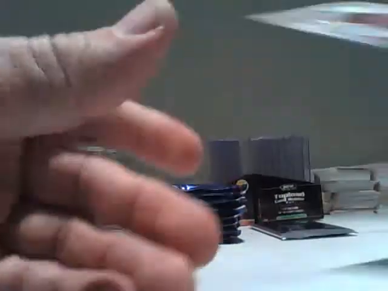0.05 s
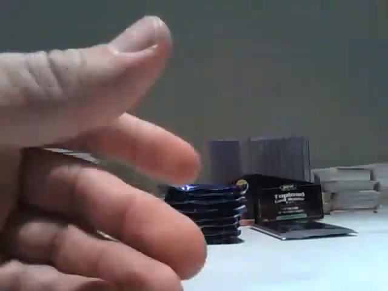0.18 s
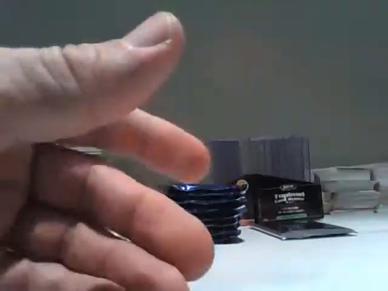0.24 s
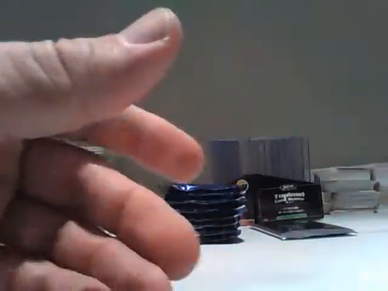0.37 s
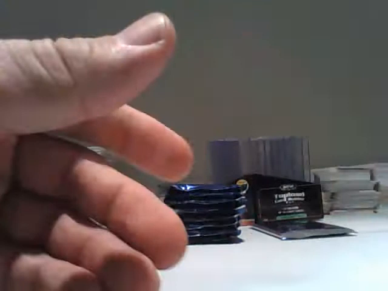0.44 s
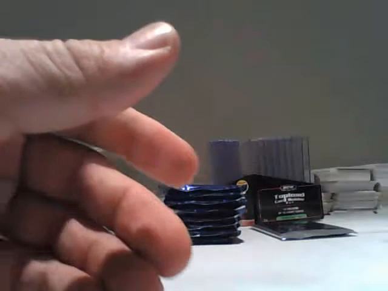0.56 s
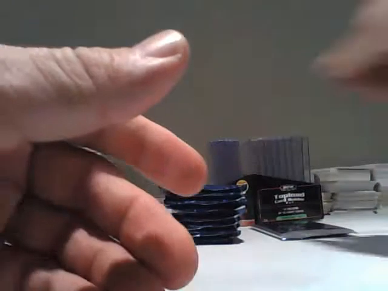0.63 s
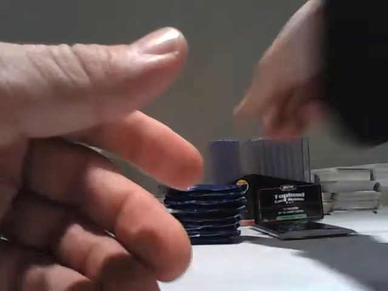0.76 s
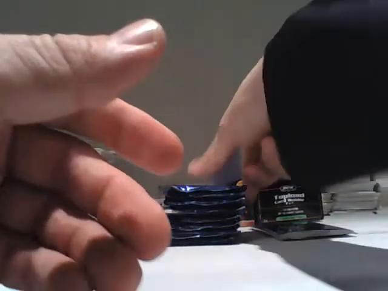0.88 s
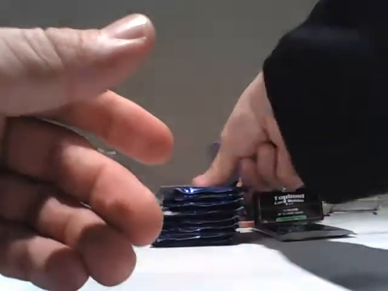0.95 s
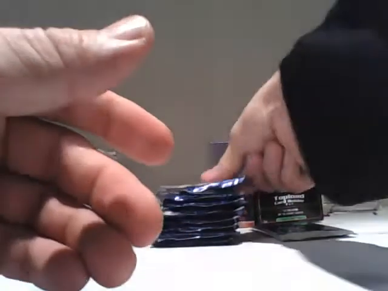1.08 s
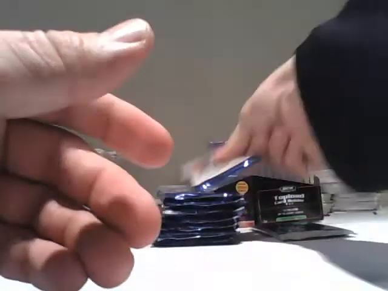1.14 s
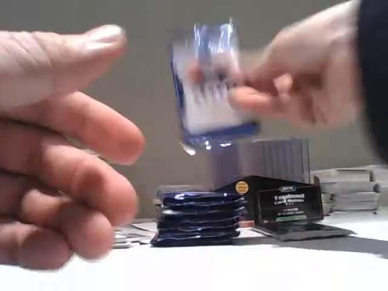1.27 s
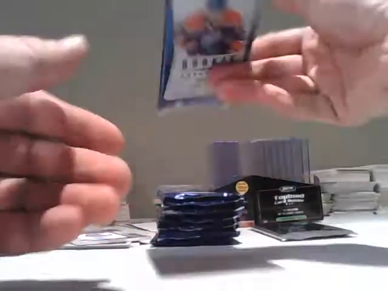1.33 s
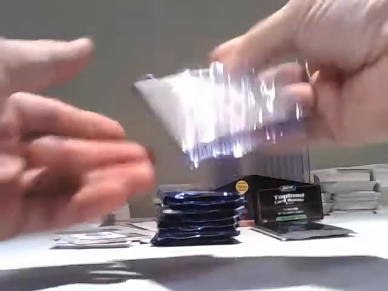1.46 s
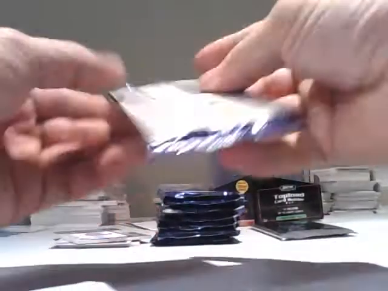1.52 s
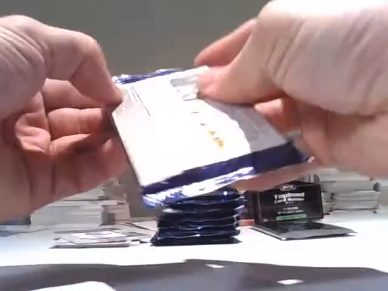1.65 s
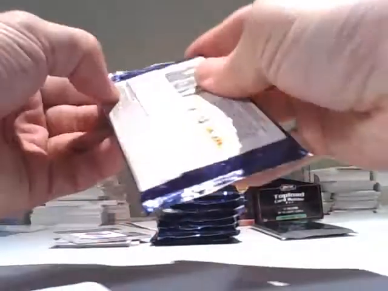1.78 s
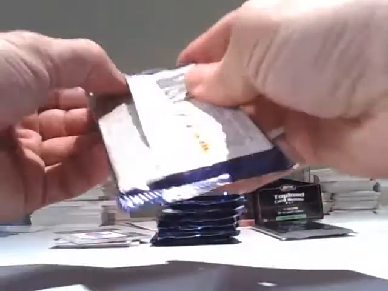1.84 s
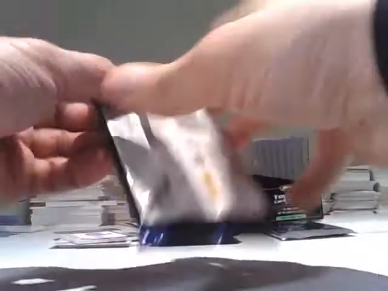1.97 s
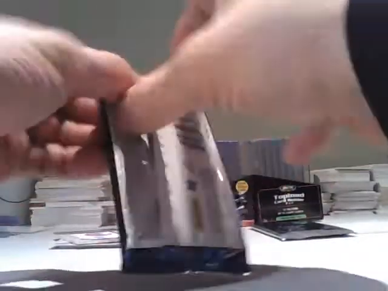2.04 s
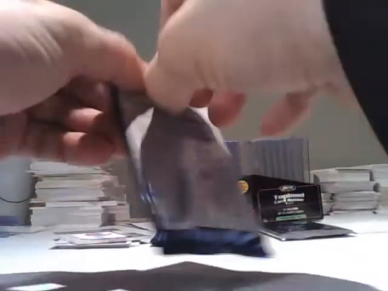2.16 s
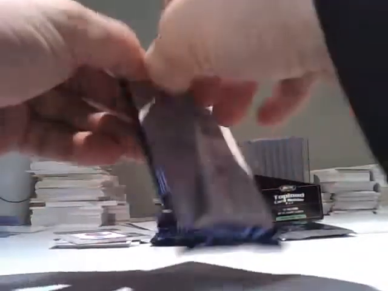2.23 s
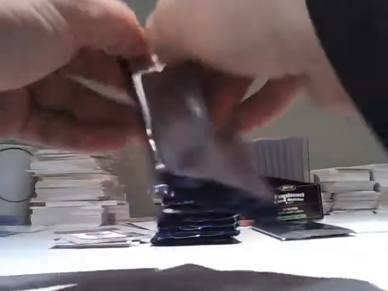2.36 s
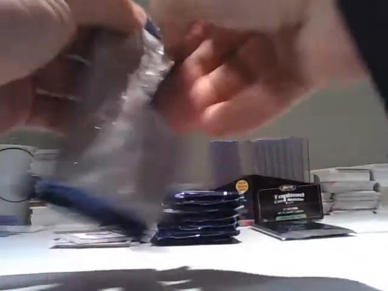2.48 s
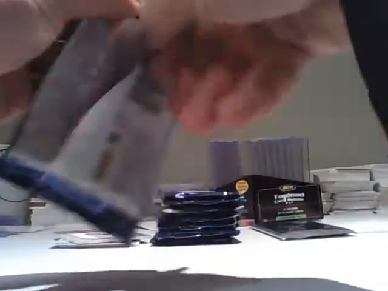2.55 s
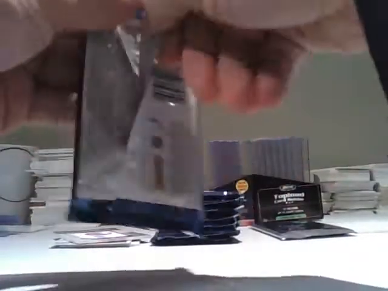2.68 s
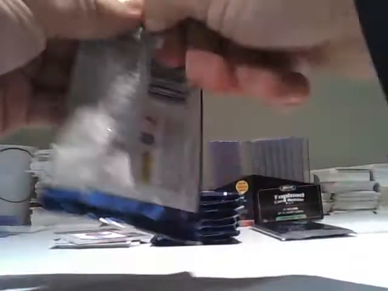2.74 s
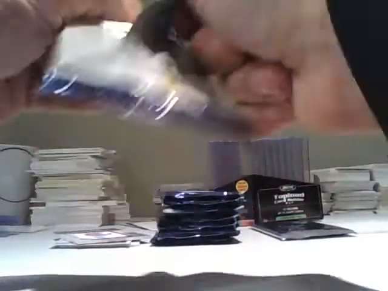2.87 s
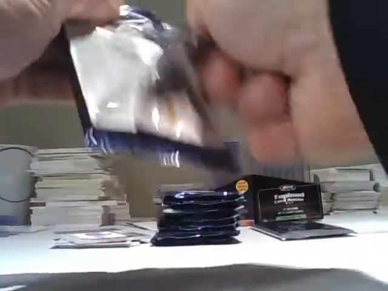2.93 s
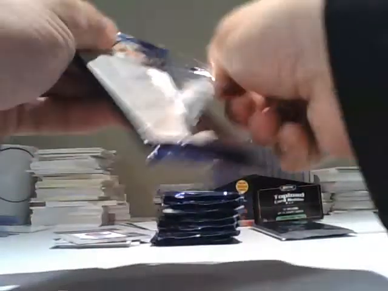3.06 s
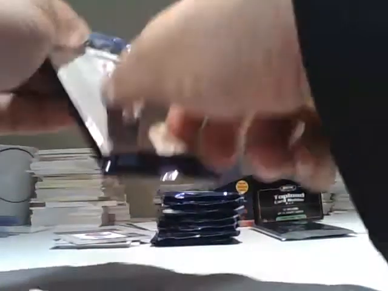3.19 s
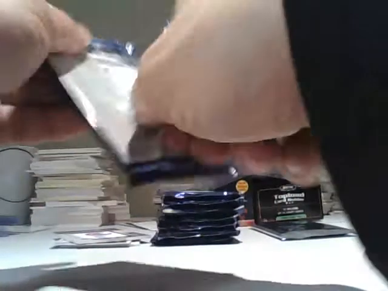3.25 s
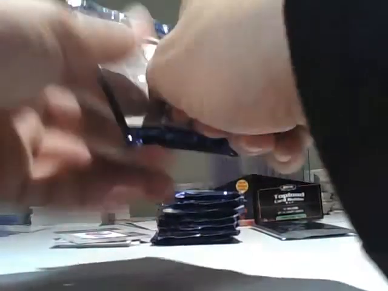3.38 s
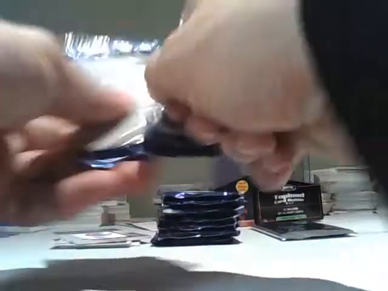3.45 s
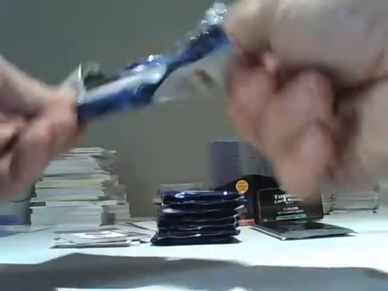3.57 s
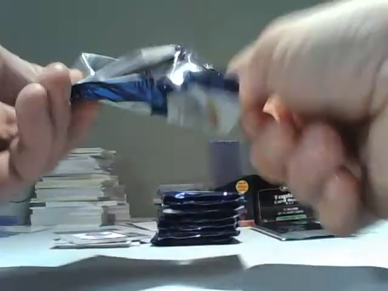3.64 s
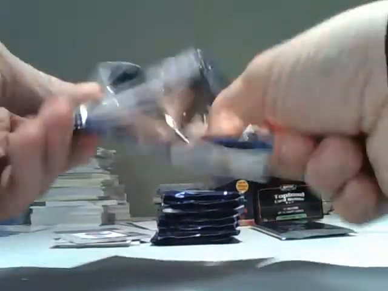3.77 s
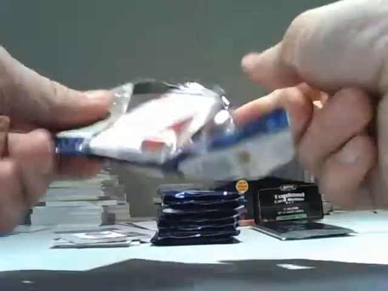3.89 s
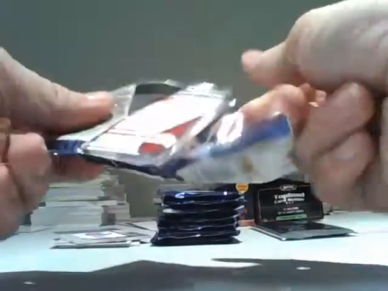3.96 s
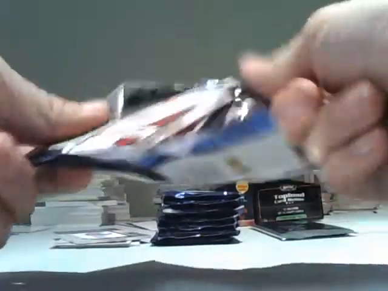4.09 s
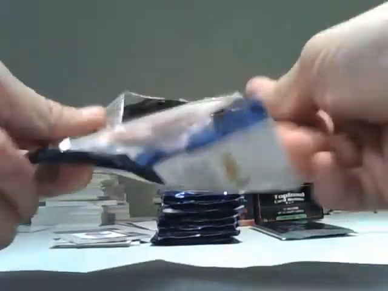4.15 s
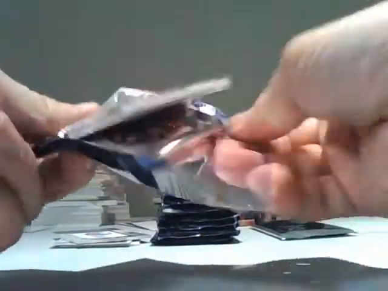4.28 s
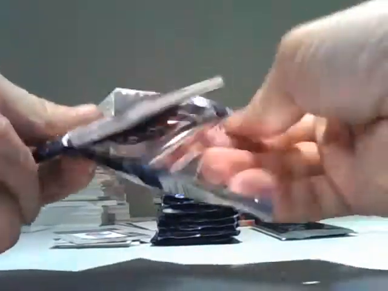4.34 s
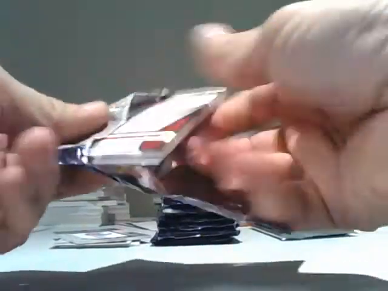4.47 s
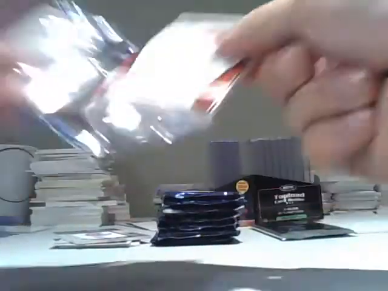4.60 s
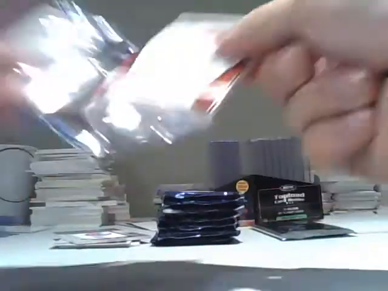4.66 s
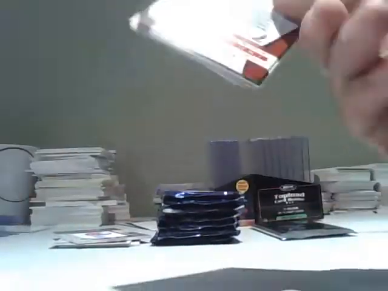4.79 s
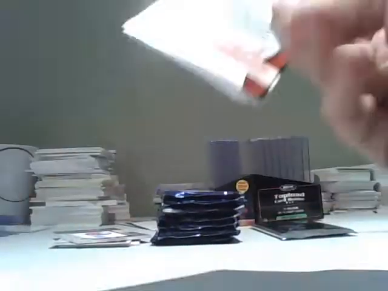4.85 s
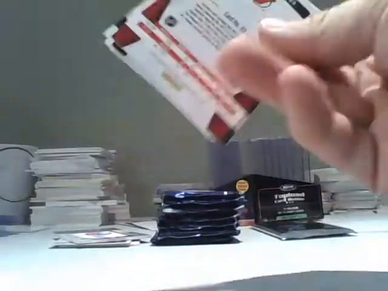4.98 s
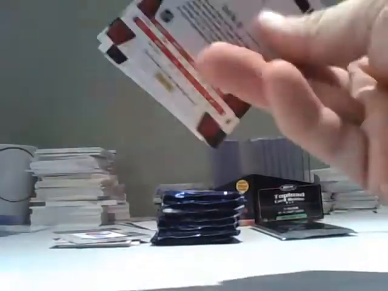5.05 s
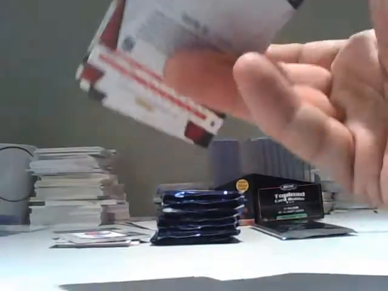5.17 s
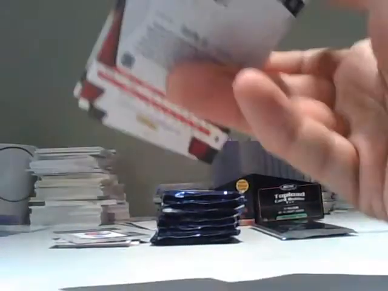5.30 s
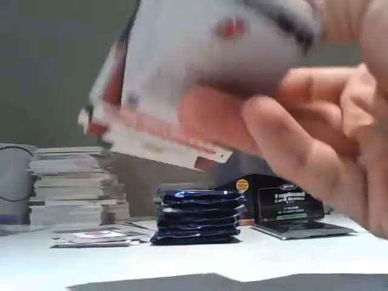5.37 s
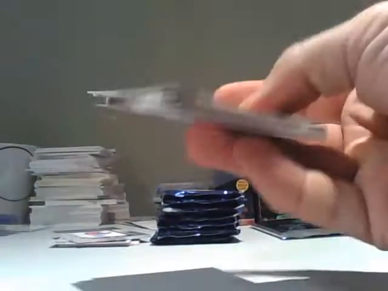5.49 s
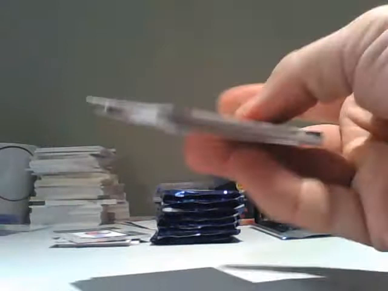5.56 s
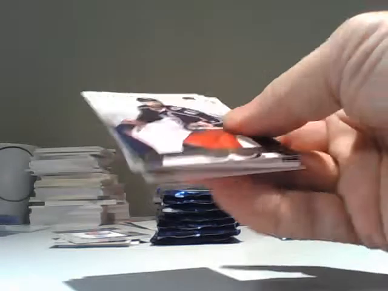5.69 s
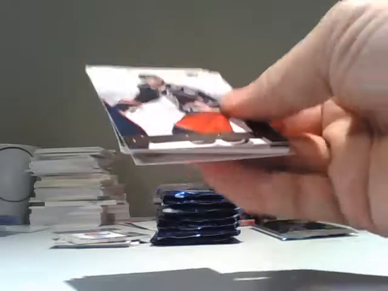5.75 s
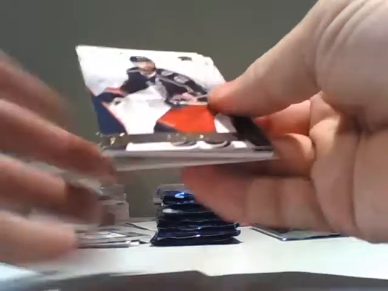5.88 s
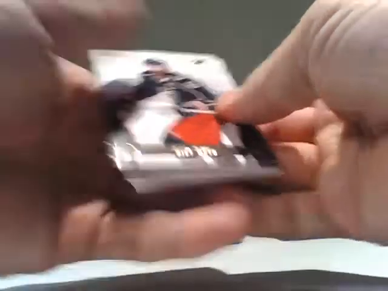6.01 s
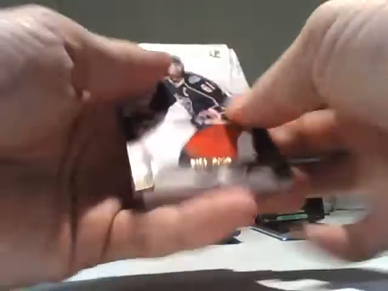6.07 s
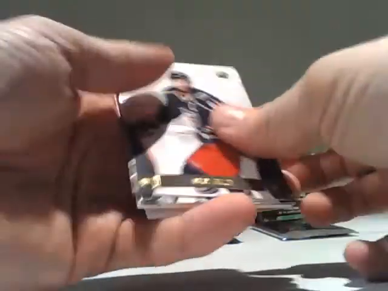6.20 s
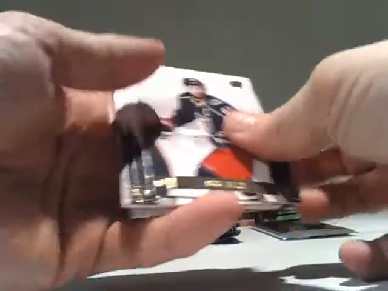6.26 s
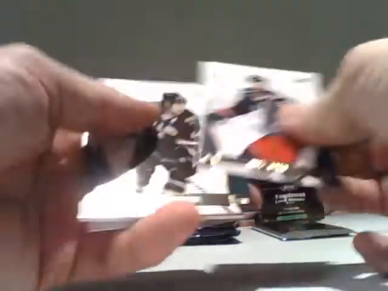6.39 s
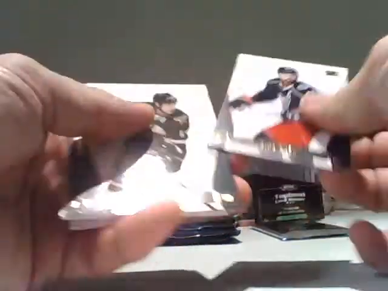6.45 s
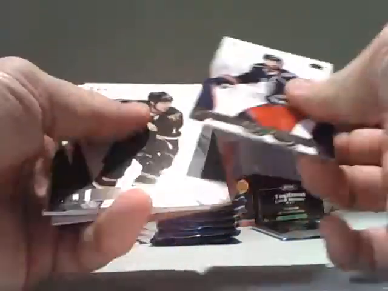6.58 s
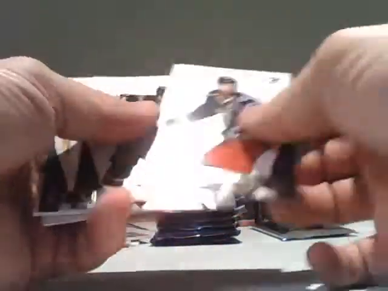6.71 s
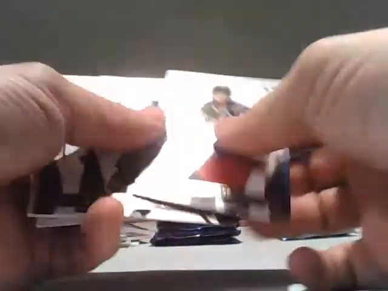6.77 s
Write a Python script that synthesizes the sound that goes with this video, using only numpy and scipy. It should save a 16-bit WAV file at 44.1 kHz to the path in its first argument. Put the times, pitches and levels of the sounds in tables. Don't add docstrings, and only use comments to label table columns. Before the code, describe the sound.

Close to a cheap webcam microphone, card edges scrape and land on a tabletop with a small hard thump. Then stiff foil crackles, snaps and pops hollowly as a packet is squeezed, ripped open and emptied, the rustling thinning into scattered ticks. A soft fan drones throughout, a thin whine joins late, and the stream repeatedly cuts out for split seconds.

```python
import sys
import numpy as np
from scipy import signal
from scipy.io import wavfile
from scipy.ndimage import uniform_filter1d

SR = 44100
rng = np.random.default_rng(int(sys.argv[2]) if len(sys.argv) > 2 else 0)


def rack_gain(trim_db):
    fader = np.asarray(trim_db, float)
    return 10 ** (fader / 20)


def persist_wave(psi):
    counts = np.round(np.clip(psi, -1, 1) * 32767).astype(np.int16)
    wavfile.write(sys.argv[1], SR, np.atleast_2d(counts).T)


N = 301157


def evened(x):
    return x / np.sqrt(np.mean(x ** 2) + 1e-20)


def peaked(x):
    return x / abs(x).max()


def read(points, hz):
    f, value = np.transpose(points)
    return np.interp(np.log(hz + 1), np.log(f + 1), value)


def add(mix, s, sound):
    part = mix[round(s * SR):][:len(sound)]
    part += sound[:len(part)]


def coloured(x, points):
    hz = abs(np.fft.fftfreq(4096, 1 / SR))
    log_gain = np.log(rack_gain(np.maximum(read(points, hz), -100)))
    taps = np.fft.ifft(np.exp(np.conj(signal.hilbert(log_gain)))).real[:2048]
    return signal.oaconvolve(x, taps / np.linalg.norm(taps))[:len(x)]


def resonate(x, hz, width):
    r = np.exp(-np.pi * width / SR)
    return 2 * signal.lfilter([1 - r], [1, -r * np.exp(2j * np.pi * hz / SR)], x).real


def wander(hz):
    return evened(signal.lfilter(*signal.butter(2, hz, fs=SR), rng.standard_normal(N)))


LET_GO_DB_PER_S = 1505


def strokes(rows, rise_db_per_s, fall_db_per_s):
    power = np.full(N, 1e-12)
    for s, length, db, sag_db in rows:
        t = np.arange(-.15, length + .06, 1 / SR)
        build = rise_db_per_s * np.minimum(t, 0)
        sag = sag_db * np.clip(t / length, 0, 1)
        stop = fall_db_per_s * np.maximum(t - length, 0)
        add(power, s + t[0], rack_gain(2 * (db + build + sag - stop)))
    return np.sqrt(power)


# [peak t/s, length t/s, crackle level/dB, sag level/dB, relative hollow level/dB]
SQUEEZES = [(1.975, 0.03, -68.5, -1, 4), (2.066, 0.11, -47.5, -33, -6), (2.192, 0.022, -76, 3, 12),
            (2.284, 0.036, -60.5, -8, -7), (2.315, 0.068, -60.5, -3, 0.5), (2.501, 0.13, -35, -16, -12),
            (2.474, 0.023, -60, 8, -1), (2.683, 0.15, -50.5, -14.5, -5.5), (3, 0.02, -44.5, 1.5, -0.5),
            (3.112, 0.013, -43, 6, -15), (3.212, 0.13, -46.5, -22.5, 2.5), (3.407, .02, -58, 3, -1),
            (3.471, 0.054, -60, -8, -9), (3.616, 0.083, -37, 1, 2), (3.702, 0.054, -34, -12.5, 5.5),
            (3.771, 0.26, -44.5, -14, 2), (4.04, 0.087, -64, 6, 4), (4.261, 0.039, -38.5, -29, -3),
            (4.19, 0.014, -56, 6, 9.5), (4.312, 0.034, -57, 4.5, 5.5), (4.377, 0.26, -49.5, -20.5, 3.5),
            (4.727, 0.057, -57, 0.5, 3.5)]
# [t/s, t/s, level/dB, level/dB, level/dB]
TUGS = [
    (2.637, 0.033, -47, 9, -7),
    (3.034, 0.073, -40, -13.5, -7.5),
    (3.132, 0.065, -34.5, -12, -2),
    (3.438, 0.021, -46.5, -21, -3),
    (3.57, 0.022, -48, -1, -10),
    (4.337, 0.031, -44.5, 1.5, -7),
    (4.626, 0.023, -53, -32, -10),
]


def squeeze():
    gains = np.zeros((2, N))
    for table, rise_db_per_s in ((SQUEEZES, 475), (TUGS, 1801)):
        rows = np.array(table)
        foil = rows[:, :4]
        hollow = foil + np.outer(rows[:, 4], [0, 0, 1, 0])
        now = [strokes(r, rise_db_per_s, LET_GO_DB_PER_S) for r in (foil, hollow)]
        gains = np.hypot(gains, now)
    return gains


# [f/Hz, width f/Hz, level/dB]
POUCH = [
    (678.5, 130, 2.5),
    (690, 120, -3),
    (850, 72, 3),
    (985, 290, -5.5),
    (1220, 91, 0.5),
    (254, 130, -9),
]


def pouch(x):
    modes = np.zeros(len(x))
    for k, (hz, width, db) in enumerate(POUCH):
        modes += (-1) ** k * rack_gain(db) * resonate(x, hz, width)
    return signal.lfilter(*signal.butter(2, 2400, fs=SR), modes)


# [f/Hz, level/dB per Hz]
FOIL = [(760, -49.5), (1300, -13), (1400, -11.5), (1660, -2.5), (2410, -10), (2750, -4), (3050, -9.5),
        (3430, -5.5), (3960, -4.5), (5180, -6.5), (7700, -7), (8520, -10), (9750, -23.5), (12700, -52.5),
        (21400, -120)]


def rustle(crackle, hollow):
    clump = rack_gain(2.1 * wander(54))
    size = rack_gain(3.5 * np.minimum(rng.exponential(1, N), 3.3)) * rng.choice([-1, 1], N)
    ticks = clump * size * (rng.random(N) < 2500 / SR)
    region = rng.integers(0, 16, N // 300 + 1).repeat(300)[:N]
    pitches = np.repeat([1700, 2050, 2750, 3950, 4450, 5900, 6500, 7900], 2) * rng.uniform(.97, 1.03, 16)
    rings = sum(evened(resonate(ticks * (region == k), hz, 160)) for k, hz in enumerate(pitches))
    bright = evened(coloured(evened(ticks) + 0.22 * evened(rings), FOIL))
    flicks = rack_gain(5.1 * np.minimum(rng.exponential(1, N), 3)) * (rng.random(N) < 260 / SR)
    bright = bright + 0.036 * evened(coloured(resonate(flicks, 5900, 4400), FOIL))
    pushes = clump * rack_gain(0.71 * wander(35)) * evened(evened(ticks) + 13.0 * rng.standard_normal(N))
    return rack_gain(-2.0) * crackle * bright + rack_gain(-5.0) * hollow * evened(pouch(pushes))


# [t/s, peak level/dB, f/Hz,
# relative air pocket level/dB]
CREASES = [(0.4515, -59, 2476, 14), (2.0591, -41.5, 2900, -11), (2.0812, -40, 3920, -36),
           (2.2975, -45, 5700, -13), (2.318, -39, 6950, -16), (2.325, -42.5, 6200, -25),
           (2.476, -32, 5000, -23), (2.4962, -38.5, 5000, 12), (2.5142, -28, 4350, -31.5),
           (2.5223, -24, 4400, -4.5), (2.529, -26.5, 8300, -22), (2.536, -29, 6350, -28),
           (2.5615, -31, 5000, -5.5), (2.5701, -36.5, 3960, -23.5), (2.6355, -37, 4200, 3.5),
           (2.6482, -31, 5160, -25), (2.703, -35, 3150, -15), (2.7758, -45, 3860, -0.5),
           (2.81, -47, 7440, -2), (3.039, -32, 2955, -2), (3.0589, -32, 2800, -17),
           (3.1096, -28, 2720, -22), (3.1329, -26, 2480, -7.5), (3.138, -24.5, 1770, -3),
           (3.152, -28, 3800, -7.5), (3.481, -52.5, 5000, -18), (3.2167, -47, 2650, -10),
           (3.257, -38, 2560, -17), (3.409, -47, 2780, -11), (3.4375, -38, 3060, -16),
           (3.921, -37.5, 4500, -6), (3.9625, -37, 3840, -9), (3.9862, -36.5, 7950, -0.5),
           (4.0263, -55.5, 2110, 12.5), (4.0969, -43.5, 4360, -8), (4.2029, -46, 4850, 2),
           (4.2114, -54, 3500, -2), (4.2442, -42, 5460, 14.5), (4.256, -35.5, 4070, -1),
           (4.2907, -48.5, 2340, 13.5), (4.3254, -48, 2760, 3), (4.3357, -32.5, 2780, 3.5),
           (4.344, -42, 3900, -12), (4.3541, -34, 4740, 3), (4.3613, -35, 5000, -20),
           (4.4005, -43.5, 2540, 2), (4.425, -55, 3190, 11), (4.4601, -38, 3970, -1.5),
           (4.6234, -37.5, 4700, -14.5), (4.6228, -42, 7550, -23), (4.7289, -29.5, 4350, -20),
           (4.7385, -43, 7500, -1),
           (2.0257, -55, 2690, -10), (2.0427, -51, 7900, -18), (2.066, -48, 8400, -22),
         (2.123, -52, 8000, -18), (2.2592, -66, 4500, -1), (2.2861, -50, 4630, -4), (2.358, -45, 7860, -18),
         (2.585, -43, 5000, -9), (2.7215, -38, 4970, -15), (2.753, -58, 7000, -20), (2.763, -44, 6800, -18),
         (3.031, -35, 6000, -7), (3.044, -48, 4300, -6), (3.3054, -49, 1660, -17),
         (3.3306, -47.5, 1920, -14), (3.594, -29, 8000, -20), (3.816, -35.5, 8300, -16),
         (3.867, -34.5, 6470, -5), (3.918, -45, 8100, -20), (3.957, -47, 2700, -12),
         (4.085, -52, 4870, -15), (4.113, -59, 8000, -20), (4.2402, -41.5, 4470, 6), (4.2517, -34, 4730, 9),
         (4.3944, -43, 3800, -4), (4.5126, -52, 5700, -13), (4.5435, -62, 6500, -15),
         (4.5855, -51, 4910, -19), (4.634, -45.5, 7500, -19), (4.748, -42, 8000, -20),
         (4.772, -61, 8000, -17), (2.299, -49, 9300, -25), (2.32, -45, 9300, -25), (3.5715, -36, 7500, -29),
         (3.691, -36.5, 7500, -17), (3.665, -31, 6870, -22), (3.923, -39.5, 6900, -20)]
# [t/s, peak level/dB, f/Hz, relative air pocket level/dB, air pocket f/Hz]
TEARING = [(3.5693, -33.5, 8000, -9, 790), (3.5734, -36.5, 4950, -7, 760), (3.578, -32, 4000, -11, 1040),
           (3.5981, -32.5, 4940, 5.5, 710), (3.611, -26, 4130, -17, 920), (3.6201, -38, 4240, 0.5, 750),
           (3.6286, -32, 4300, -2, 620), (3.64, -29.5, 3970, -3, 913), (3.6542, -24.5, 4030, -3.5, 850),
           (3.6625, -34, 4140, 5.5, 595), (3.683, -23, 4570, -7.5, 495), (3.6875, -27.5, 4000, 8.5, 660),
           (3.6955, -24, 2750, 9.5, 850), (3.706, -33, 2630, 14.5, 912), (3.7125, -31, 4010, 3, 766),
           (3.7186, -34.5, 7500, 10, 655), (3.7599, -33, 2800, 0, 940), (3.7743, -42.5, 2200, 5, 583),
           (3.786, -35, 4750, -7, 710), (3.8235, -34, 2000, 1, 720), (3.856, -37.5, 2060, -1, 740),
           (3.872, -35, 3430, -5, 930), (3.8796, -41, 8100, 5, 1220)]
POCKET_HZ = 820


def snaps():
    rows = [(*row, POCKET_HZ) for row in CREASES] + list(TEARING)
    out, t = np.zeros(N), np.arange(1400) / SR
    for (s, db, hz, pocket_db, pocket_hz), noise in zip(rows, rng.standard_normal((len(rows), len(t)))):
        burst = noise * np.exp(-t / 0.0016) * np.minimum(t / 0.00055, 1)
        crack = coloured(peaked(burst) + 1.5 * peaked(resonate(burst, hz, 600)), FOIL)
        pop = -np.sin(2 * np.pi * pocket_hz * t) * t * np.exp(-t / .00095)
        hollow = peaked(np.gradient(pop)) + 0.23 * peaked(pouch(burst))
        add(out, s, rack_gain(db) * (peaked(crack) + rack_gain(pocket_db) * peaked(hollow)))
    return out


# [start t/s, length t/s, f/Hz, level/dB]
TAUT = [(0.489, 0.022, 930, -68), (0.539, 0.046, 6170, -69), (0.573, 0.056, 590, -54),
        (0.583, 0.04, 3860, -75), (2.021, 0.028, 2830, -73), (2.095, 0.022, 6060, -68),
        (2.297, 0.03, 830, -69), (2.313, 0.024, 2030, -67), (2.319, 0.024, 8340, -73),
        (2.325, 0.032, 5860, -65), (2.494, 0.044, 860, -45), (2.524, 0.014, 1690, -52),
        (2.566, 0.018, 3890, -55), (2.628, 0.018, 830, -51), (2.718, 0.038, 2100, -65),
        (2.78, 0.022, 3890, -69), (3.011, 0.062, 930, -53), (3.057, 0.04, 1960, -58),
        (3.109, 0.028, 2790, -54), (3.125, 0.044, 860, -45), (3.255, 0.032, 590, -60),
        (3.255, 0.086, 2690, -64), (3.438, 0.034, 1890, -67), (3.46, 0.014, 6060, -74),
        (3.484, 0.024, 5820, -75), (3.592, 0.07, 830, -42), (3.684, 0.028, 2720, -46),
        (3.702, 0.038, 3820, -47), (3.807, 0.034, 790, -49), (3.817, 0.04, 1960, -56),
        (3.903, 0.146, 830, -50), (3.993, 0.036, 3960, -60), (4.089, 0.032, 7990, -71),
        (4.091, 0.032, 4890, -67), (4.093, 0.038, 3690, -68), (4.095, 0.014, 6270, -72),
        (4.2, 0.016, 4930, -73), (4.202, 0.054, 790, -44), (4.26, 0.062, 3890, -53),
        (4.29, 0.06, 2790, -54), (4.422, 0.06, 690, -54), (4.452, 0.06, 4000, -63), (4.52, 0.036, 830, -66),
        (4.729, 0.07, 5990, -78), (4.737, 0.06, 790, -65), (4.747, 0.026, 4000, -68),
        (4.749, 0.052, 2000, -65), (5.28, 0.052, 2720, -79),
        (0.53, .03, 2350, -52), (0.51, .04, 3400, -65.5), (0.52, .035, 740, -57), (3.64, .05, 575, -46),
         (1.95, .02, 8200, -64), (1.98, .06, 2300, -75), (1.995, .03, 3900, -70), (2.335, .03, 7500, -64),
         (2.335, .025, 9300, -65), (2.72, .02, 4100, -58), (3.2, .018, 6000, -54), (2.8, .04, 2200, -37),
         (3.605, .065, 3400, -49), (3.924, .045, 4000, -66), (4.21, .02, 3600, -57),
         (4.414, .012, 8000, -69), (4.9, .008, 9200, -65), (4.771, .025, 930, -62), (.515, 0.017, 230, -47),
         (3.715, 0.026, 690, -44), (2.05, 0.0302, 1400, -56.5), (4.23, 0.032, 270, -52),
         (3.28, .04, 1560, -62), (4.285, 0.0089, 960, -45), (3.1, 0.076, 1250, -56), (.451, .006, 720, -58),
         (3.685, 0.027, 573, -39.5), (3.437, 0.0065, 7000, -56)]


def singing():
    out, rows = np.zeros(N), TAUT
    for (s, length, hz, db), noise in zip(rows, rng.standard_normal((len(rows), 9000))):
        t = np.arange(0, length + .012, 1 / SR)
        width = 70 + hz / 45
        tone = evened(resonate(resonate(noise, hz, width), hz, 2 * width)[-len(t):])
        shape = np.clip(np.minimum(t / .004, (length + 0.015 - t) / 0.01), 0, 1)
        sag_db = -6 * t / length
        add(out, s, rack_gain(-1.5 + db + sag_db) * shape * tone)
    return out


# [f/Hz, level/dB, time to fall 60 dB t/s]
TABLE = [(125, -18.5, 0.16), (152, -10, 0.23), (194, 5.5, 0.066), (238, 4.5, 0.075), (350, 0, 0.057),
         (572, -18.5, 0.18), (755, -9.5, 0.062), (1354, -12, 0.03), (1780, -18.5, 0.034), (2430, -28, 0.12),
         (3760, -35, 0.26), (4370, -29, 0.11), (6000, -41.5, .1)]
LANDING_S = 0.5355


def landing():
    out, t = np.zeros(N), np.arange(SR // 3) / SR
    noise = rng.standard_normal((2, len(t)))

    whoosh = evened(resonate(noise[1], 200, 250)) * np.exp(-((t - .017) / 0.011) ** 2)
    add(out, LANDING_S - .022, rack_gain(-51) * whoosh)

    edge = resonate(resonate(noise[0], 3800, 1200), 3800, 1200)
    edge = edge + 0.13 * resonate(resonate(noise[0], 4800, 900), 4800, 900)
    click = evened(resonate(resonate(edge, 6300, 4000), 5500, 6000))
    add(out, LANDING_S - .004, rack_gain(-33.5) * click * np.exp(-((t - .006) / 0.0023) ** 2))

    turns = np.cumsum(600 + 600 * np.exp(-((t - .0045) / 0.0018) ** 2)) / SR
    slap = np.sin(2 * np.pi * turns) * np.exp(-((t - .004) / .0026) ** 2)
    add(out, LANDING_S, rack_gain(-20.5) * slap)

    shake = .6 + .7 * evened(uniform_filter1d(noise[1], 160))
    top = np.zeros(len(t))
    for hz, db, t60 in TABLE:
        top += rack_gain(db - 60 * t / t60) * np.sin(2 * np.pi * hz * t) * (shake if hz > 500 else 1)
    add(out, LANDING_S + 0.006, rack_gain(-18) * peaked(top * np.minimum(t / 0.0024, 1)))
    return out


# [peak t/s, length t/s, scrape level/dB, sag level/dB]
SLIDE = [
    (.451, 0.011, -66, -15),
    (.488, 0.04, -62.5, 1.5),
    (.538, 0.03, -31, -18.5),
    (.57, 0.085, -54, -18.5),
]
# [f/Hz, level/dB per Hz]
CARD = [(240, -32), (400, -6), (597, -4.5), (692, -6.5), (1390, -11.5), (1740, -10.5), (1960, -17.5),
        (2150, -23.5), (4610, -23), (9750, -60.5), (12700, -73.5), (21400, -120)]


def slide():
    t = np.arange(N) / SR
    grains = rack_gain(2.0 * wander(150)) * rng.standard_normal(N)
    bands = resonate(grains, 2200, 500) + resonate(grains, 3400, 800)
    loose = evened(resonate(bands, 2500, 2000)) * (t < LANDING_S)
    return strokes(SLIDE, 1600.5, LET_GO_DB_PER_S) * (evened(coloured(grains, CARD)) + 0.43 * loose)


# [t/s, f/Hz, level/dB, time to fall 60 dB t/s]
RINGS = [
    (5.272, 2730, -77, .5),
    (5.272, 3420, -76, .12),
    (1.975, 2680, -64, .15),
    (4.969, 5200, -58, .02),
]


def ringing():
    out, t = np.zeros(N), np.arange(SR // 3) / SR
    for s, hz, db, t60 in RINGS:
        add(out, s, rack_gain(db - 60 * t / t60) * np.sin(2 * np.pi * hz * t))
    return out


# [f/Hz, time to fall 60 dB t/s]
ROOM = [
    (200, 0.14),
    (1000, 0.09),
    (4000, 0.13),
    (9000, 0.015),
]


def room(x):
    taps = np.zeros(SR // 2)
    at = np.arange(150, len(taps) - 20, 20)
    taps[at + rng.integers(0, 20, len(at))] = rng.choice([-1., 1.], len(at))
    hz, t, z = signal.stft(taps, SR, nperseg=256)
    tail = signal.istft(z * rack_gain(-60 * t / read(ROOM, hz)[:, None]), SR, nperseg=256)[1]
    return signal.fftconvolve(x, tail / np.linalg.norm(tail))[:N]


# [multiple of the shaft speed, rms level/dB]
FAN_ORDERS = [(3, -79), (4, -60), (5, -80), (6, -84), (7, -77), (8, -66), (9, -82), (12, -80), (14, -85),
              (15, -83), (17, -79), (18, -84), (24, -84), (34, -88), (51, -91)]
# [f/Hz, level/dB per Hz]
AIR = [(50, -68.5), (85, -22), (160, -5), (188, -8.5), (269, -15), (315, -16.5), (369, -8.5), (478, -18),
       (784, -18), (884, -19), (1950, -23), (3270, -31.5), (6820, -38), (7840, -35.5), (9750, -53.5),
       (12700, -91), (21400, -120)]


def fan():
    shaft_hz = 46.13 * (1 + .002 * wander(2.44))
    turns = np.cumsum(shaft_hz) / SR
    tones = np.zeros(N)
    for k, db in FAN_ORDERS:
        tones += rack_gain(db + 0.73 * wander(5.1)) * np.cos(2 * np.pi * (k * turns + rng.random()))
    frames, hz = N // 512 + 5, np.fft.rfftfreq(2048, 1 / SR)
    a, b, patches = rng.standard_normal((frames, 1025, 3)).T
    patches = evened(uniform_filter1d(uniform_filter1d(patches, 14, 0), 6, 1))
    spectrum = (a + 1j * b) * rack_gain(read(AIR, hz)[:, None] + 1.0 * patches)
    air = signal.istft(spectrum, nperseg=2048, noverlap=1536)[1]
    return rack_gain(3.0) * tones + rack_gain(-63) * evened(air[:N])


def lift(crackle):
    over_db = np.maximum(20 * np.log10(crackle) + 72.5, 0)
    return rack_gain(0.2 * uniform_filter1d(over_db, int(0.24 * SR)))


def whine():
    t = np.arange(N) / SR
    return rack_gain(-86.5 + 1.7 * wander(25)) * np.sin(2 * np.pi * 8000 * t) * (t > 4.83)


def scene():
    crackle, hollow = squeeze()
    creases = snaps()
    cards = landing() + ringing()
    near = rustle(crackle, hollow) + slide() + singing() + creases + cards
    echoes = rack_gain(-6.5) * room(creases) + rack_gain(-17.5) * room(cards)
    return (near + echoes + lift(crackle) * fan() + whine())[None]


# [start t/s, end t/s, depth level/dB]
HOLES = [(0.478, 0.485, -24), (0.687, 0.714, -27), (1.136, 1.16, -51), (1.185, 1.223, -50),
         (1.262, 1.273, -25), (1.294, 1.338, -41), (1.471, 1.53, -37), (1.967, 1.977, -37),
         (2.144, 2.17, -38), (2.222, 2.251, -46), (2.271, 2.284, -29), (2.382, 2.474, -62),
         (2.473, 2.509, -16.5), (2.602, 2.629, -8), (2.656, 2.68, -18.5), (2.831, 2.998, -71),
         (2.993, 3.033, -12), (3.103, 3.129, -9.5), (3.344, 3.4, -53), (3.587, 3.604, -8.5),
         (3.795, 3.814, -8), (4.146, 4.203, -42), (4.36, 4.391, -7.5), (4.655, 4.712, -39),
         (4.728, 4.757, -9), (4.801, 4.839, -60), (4.975, 5.017, -57), (5.102, 5.145, -30),
         (5.232, 5.272, -33)]


def stream_gain():
    t, passed = np.arange(N) / SR, np.ones(N)
    for start, end, db in HOLES:
        shut = np.clip(np.minimum(t - start + 0.0093, end + 0.01 - t) / 0.016, 0, 1)
        passed *= 1 - (1 - rack_gain(db)) * np.sin(np.pi / 2 * shut) ** 2
    return passed


# [t/s, length t/s, level/dB]
LEAKS = [
    (1.193, 0.0037, -70),
    (2.443, 0.026, -81.5),
    (2.894, 0.0035, -83),
    (2.973, 0.021, -75.5),
]


def leaks():
    out = np.zeros(N)
    for s, length, db in LEAKS:
        scrap = coloured(rng.standard_normal(round(length * SR)), FOIL)
        add(out, s, rack_gain(db) * evened(scrap) * signal.windows.tukey(len(scrap), .4))
    return out


def hiss(passed):
    level_db = -74.5 + 3.17 * (uniform_filter1d(passed, 500) - 4.0)
    return rack_gain(level_db) * rng.standard_normal(N)


def top_cut(x):
    return signal.sosfilt(signal.butter(12, 15612, fs=SR, output="sos"), x)


def record(dry):
    cut = signal.sosfilt(signal.ellip(6, .3, 34, 118, "highpass", fs=SR, output="sos"), dry)
    cut = signal.sosfilt(signal.butter(8, 12400, fs=SR, output="sos"), cut)
    passed = stream_gain()
    mix = cut * passed + leaks() + hiss(passed)
    return top_cut(mix)


dry = scene()
out = record(dry)
persist_wave(out)
```